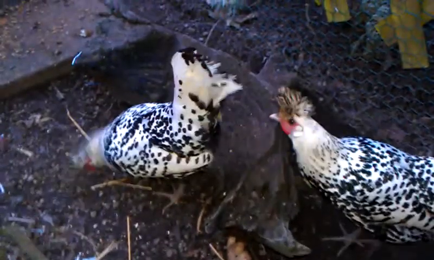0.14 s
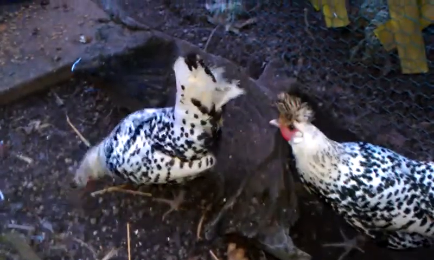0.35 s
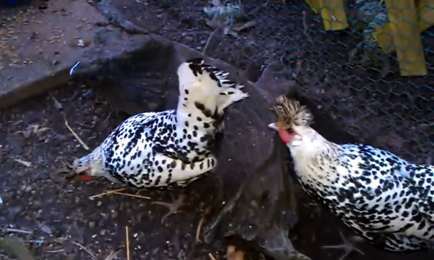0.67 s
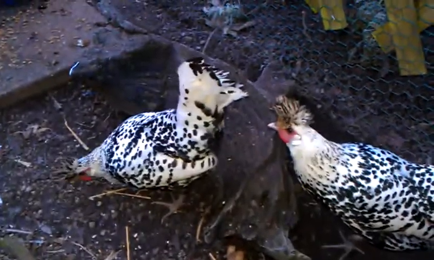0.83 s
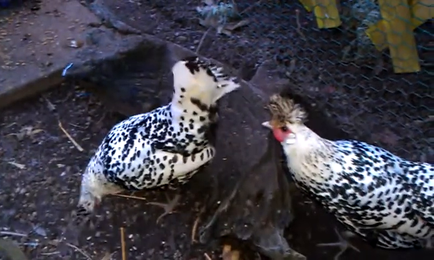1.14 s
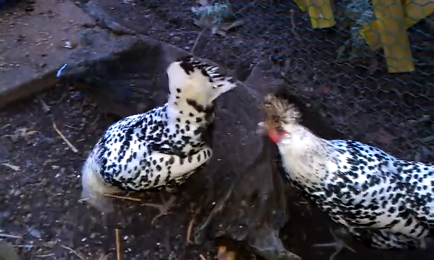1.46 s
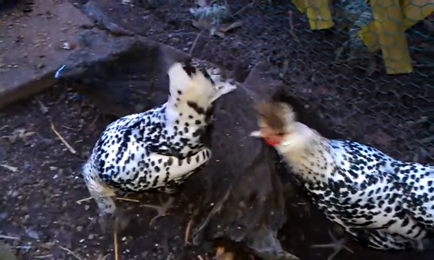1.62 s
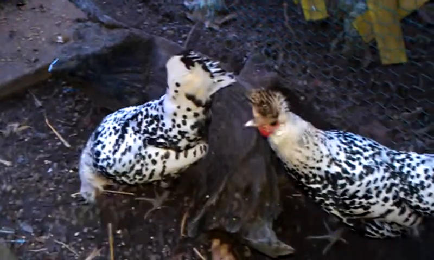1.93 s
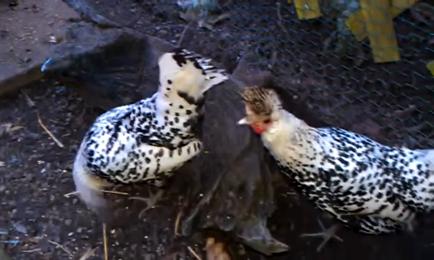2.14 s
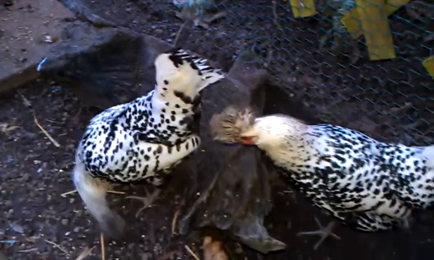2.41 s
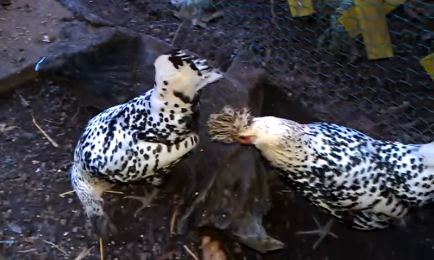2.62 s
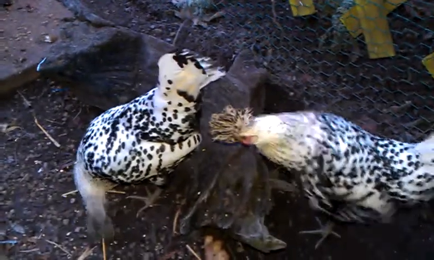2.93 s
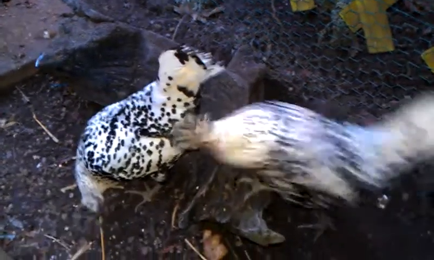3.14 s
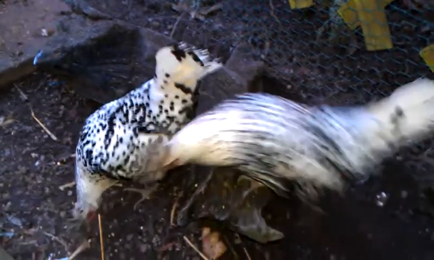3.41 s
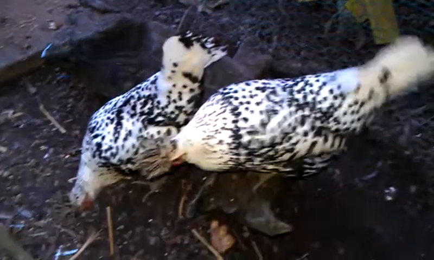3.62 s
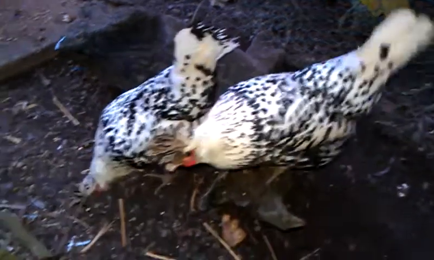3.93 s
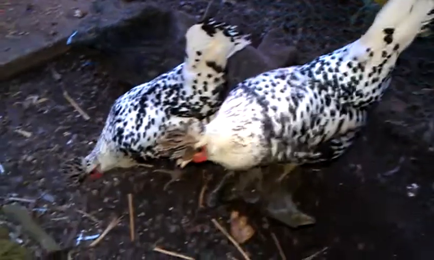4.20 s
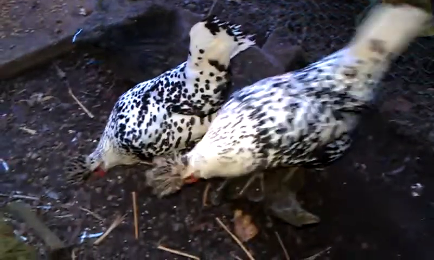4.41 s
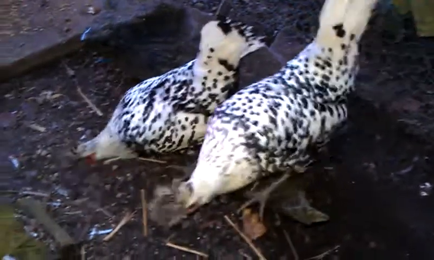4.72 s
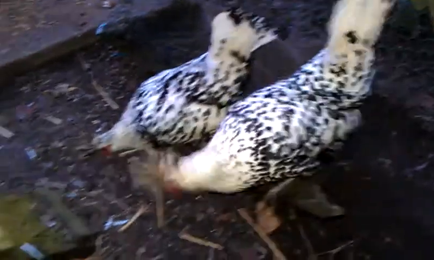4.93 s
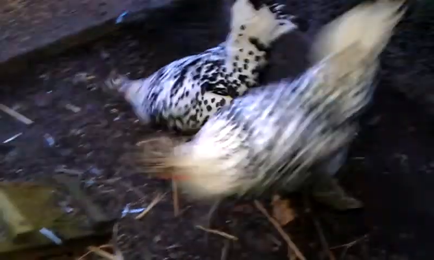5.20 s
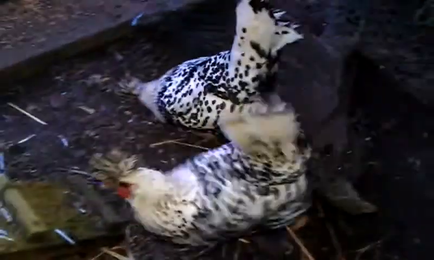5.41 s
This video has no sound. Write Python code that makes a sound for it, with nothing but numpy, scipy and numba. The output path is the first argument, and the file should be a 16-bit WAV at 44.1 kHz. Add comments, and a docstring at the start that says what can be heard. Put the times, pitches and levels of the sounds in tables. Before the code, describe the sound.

A close hen builds from a thin, climbing whine through a rough growl to about seven quick, raspy cackles, the loudest sound here. Before and just after her outburst, a small bird further off gives short, high, mostly falling chirps with some coop echo. Dry litter rustles and clicks under foot, feathers brush by near the end, and other birds murmur faintly in the quiet outdoor air of the run.

```python
"""Coop run, close to a hen. Her thin rising whine turns husky, breaks into a growl, then into a fast run
of harsh cackles: uneven syrinx pulses ring her mouth and open beak, coloured by fixed narrow resonances.
Further off, a small bird whistles sliding chirps in the echoing coop and other birds murmur.
Litter ticks and rustles under foot and feathers brush past, over quiet outdoor air."""
import sys
import numpy as np
from scipy import signal
from scipy.fft import rfft, irfft, next_fast_len
from scipy.io import wavfile
from scipy.ndimage import uniform_filter1d
from numba import njit

SR = 44100
rng = np.random.default_rng(int(sys.argv[2]) if len(sys.argv) > 2 else 0)


def master_out(mix):
    """Clip the mix to full scale and print it as 16-bit PCM to the path in sys.argv[1]."""
    frames = np.transpose(np.atleast_2d(mix))
    ceiling = np.clip(frames, -1, 1)
    pcm = np.round(ceiling * 32767).astype(np.int16)
    wavfile.write(sys.argv[1], SR, pcm)


N = 245195
T = np.arange(N) / SR

# outdoor air spectrum: (frequency [Hz], gain [dB])
AIR_SPECTRUM = [(15, -24), (25, -0.5), (144, -1), (221, -1.5), (322, -3), (552, -3.5), (648, -2),
                (945, -3.5), (2420, -11.5), (4040, -11), (6380, -10.5), (7910, -5), (9300, -13),
                (10400, -9), (15500, -18.5)]
# distant hens and one thin high note:
# (start [s], length [s], start pitch [Hz], end pitch [Hz], level [dB])
MURMUR_NOTES = [(0.937, 0.051, 649, 643, -65), (1.212, 0.13, 990, 1068, -60.5),
                (2.619, 0.365, 7800, 7980, -63), (2.703, 0.16, 930, 910, -61.5),
                (2.847, 0.093, 597, 625, -64.5), (5.382, 0.08, 1050, 1006, -58.5)]
# falling whistles: (time of top [s], lead-in [s], length after top [s], top pitch [Hz],
# bottom pitch [Hz], glide time [s], relative level [dB])
FALLING_NOTES = [(1.358, 0.035, 0.083, 6850, 4547, 0.022, -38.5),
                 (1.557, .014, 0.113, 4984, 2900, 0.033, -42), (1.883, 0.052, 0.21, 6736, 4600, 0.021, -35),
                 (2.085, 0.0082, .14, 4890, 3180, 0.042, -38.5),
                 (2.427, 0.04, 0.079, 6785, 4480, 0.032, -34), (2.651, .012, 0.11, 4770, 2790, .04, -42),
                 (5.335, 0.037, 0.094, 6775, 4480, 0.023, -35), (5.536, 0.0069, .1, 4960, 3190, .037, -33)]
# rising whistles: (start [s], length [s], held pitch [Hz], relative level [dB])
RISING_NOTES = [(1.673, 0.099, 4520, -44), (2.227, 0.092, 4415, -42.5), (2.77, 0.078, 4414, -43.5)]
# claws and grit: (time [s], level [dB])
CLAW_TICKS = [(.072, -49), (3.01, -51), (3.452, -46), (3.757, -47.5), (4.083, -33), (4.151, -41),
              (4.179, -44), (4.2745, -32.5), (5.3245, -27)]
# litter and feathers: (start [s], length [s], level [dB])
LITTER_RUSTLES = [(0.13, 0.53, -64), (0.514, 0.033, -61), (1.492, 0.11, -56), (2.019, 0.12, -55),
                  (2.598, 0.06, -54.5), (2.792, 0.03, -56), (3.006, 0.023, -53.5), (4.175, 0.043, -46.5),
                  (4.604, 0.098, -49.5), (5.167, 0.17, -46.5), (5.332, 0.065, -40.5), (5.413, 0.046, -44),
                  (5.485, 0.059, -52.5)]
# tick and rustle spectrum: (frequency [Hz], gain [dB])
LITTER_SPECTRUM = [(1500, -34.5), (3500, -10), (5500, -7.5), (7600, 2.5), (9000, -7.5), (11000, -17.5),
                   (15500, -24)]
# reflections off ground and boards: (delay [s], gain [dB])
NEAR_REFLECTIONS = [(.00235, -13.5), (.0035, -12), (.0071, -10.5)]
# fixed narrow resonances that colour the hen's calls in the coop: (frequency [Hz], width [Hz], gain [dB])
COOP_RESONANCES = [(381.7, 14.3, -10.5), (650, 26, -11.5), (856, 116, -2.5), (1057, 128, 4.5),
                   (1326, 46, 8.5), (1440, 68, 6.5), (1560, 27, 4.5), (1738, 16, 2), (1908, 70, 0),
                   (2130, 230, -7.5)]
# what the mouth lets out: (frequency [Hz], gain [dB])
MOUTH_RESPONSE = [(260, -74), (355, 0), (460, -4.5), (620, 2.5), (1750, 1), (2130, -8), (2500, -2),
                  (3300, -24), (6000, -46)]
# short clucks ahead of calls: (time [s], level [dB])
SYRINX_CATCHES = [(3.139, -47.5), (4.268, -39.5), (4.393, -41.5), (4.643, -44), (4.803, -42.5),
                  (4.953, -48), (5.102, -44.5)]
# whine pitch, a dip then a climb with pressure: (time [s], pitch [Hz])
WHINE_CONTOUR = [(3.17, 762), (3.2, 636), (3.282, 641), (3.324, 707), (3.342, 694), (3.79, 820.5)]
# whine, stuttering then held with two breaks: (start [s], end [s], level [dB])
WHINE_SPANS = [(3.177, 3.183, -47.5), (3.196, 3.221, -51), (3.231, 3.269, -48), (3.28, 3.294, -48.5),
               (3.305, 3.653, -49), (3.66, 3.743, -47.5), (3.753, 3.875, -46.5)]
# syrinx pulses, quickening with excitement: (time [s], nominal rate [Hz])
SYRINX_RATE = [(4.05, 174.9), (4.7, 249.8), (5.0, 262.8)]
# rasp spectrum ahead of the beak modes: (frequency [Hz], gain [dB])
RASP_SPECTRUM = [(1900, -44), (2750, 5.5), (3500, 0), (3850, 6), (5450, 1), (6500, 1), (8000, 4),
                 (9300, -7), (10200, -55), (15500, -56)]
# open beak: (multiple of lower beak resonance [ratio], width [Hz], relative gain [dB])
LOWER_BEAK_MODES = [(.87, 150, -17), (1., 287, 1.5), (1.225, 200, -5), (2.06, 260, -8)]
# high sizzle on the rasp: (frequency [Hz], gain [dB])
SIZZLE_SPECTRUM = [(7000, -12), (9200, 2), (10400, 2), (11300, 0), (15500, -19)]
# calls, a long growl first: (start [s], end [s], start level [dB], swell over call [dB],
# start rasp re level [dB], start syrinx ring [Hz], mouth resonance [Hz], lower beak resonance [Hz],
# upper beak resonance [Hz], upper resonance gain [dB])
CACKLE_CALLS = [(3.786, 4.175, -43.5, 9.5, -11.5, 798.4, 1410, 4980, 7770, 6.5),
                (4.279, 4.324, -32.5, -2.5, -13.5, 800, 1390, 4700, 7650, -15),
                (4.398, 4.423, -36, 10, -16, 990, 1540, 4660, 7350, 3),
                (4.419, 4.568, -33.5, -1.5, -10, 864, 1630, 4500, 7760, 9.5),
                (4.653, 4.73, -27.5, -2, -4.5, 845, 1560, 4460, 7270, 16.5),
                (4.812, 4.867, -29, -3, -2.5, 895, 1590, 4620, 7570, 20),
                (4.963, 5.028, -27, -3, -2.5, 810, 1620, 4250, 7120, 13),
                (5.11, 5.188, -25.5, -8.5, -1, 850, 1640, 4540, 7760, 18),
                (5.274, 5.31, -37.5, 9, -15, 890, 1670, 5028, 8230, 14)]


def undb(db):
    """Decibels to gain."""
    return 10 ** (np.asarray(db) / 20)


def unit(x):
    """Scale to rms 1."""
    return x / np.sqrt(np.mean(x ** 2))


def even(x, span_s):
    """Hold rms near 1 over span_s; keep the faster grain."""
    return x / np.sqrt(uniform_filter1d(x ** 2, int(span_s * SR)) + 1e-9 * np.mean(x ** 2))


def noise():
    """White noise."""
    return rng.standard_normal(N)


def walk(rate_hz):
    """Smooth random wander, rms 1."""
    size = int(SR / rate_hz)
    return unit(uniform_filter1d(uniform_filter1d(noise(), size), size))


def curve(points):
    """Straight lines through (time [s], value) points."""
    return np.interp(T, *np.transpose(points))


def swell(start_s, length_s):
    """Half-sine envelope."""
    return np.sin(np.pi * np.clip((T - start_s) / length_s, 0, 1))


def held(start_s, end_s, attack_s, release_s):
    """Flat envelope, ramps centred on start and end."""
    return np.clip(.5 + (T - start_s) / attack_s, 0, 1) * np.clip(.5 + (end_s - T) / release_s, 0, 1)


def bursts(rows, decay_s):
    """Envelope of sudden onsets with exponential decay."""
    return sum(undb(db) * (T >= at_s) * np.exp(-np.abs(T - at_s) / decay_s) for at_s, db in rows)


def colour(x, spectrum):
    """Filter by (frequency [Hz], gain [dB]) points."""
    hz, db = np.transpose(spectrum)
    size = next_fast_len(N)
    bins_hz = np.maximum(np.fft.rfftfreq(size, 1 / SR), 1)
    gain = undb(np.interp(np.log(bins_hz), np.log(hz), db))
    return irfft(rfft(x, size) * gain, size)[:N]


@njit
def svf(x, hz, width_hz):
    """State-variable band-pass, moving centre."""
    y, band, low = np.empty(len(x)), 0., 0.
    for i in range(len(x)):
        g, damping = np.tan(np.pi * hz[i] / SR), width_hz / hz[i]
        v = (band + g * (x[i] - low)) / (1 + g * (g + damping))
        band, low = 2 * v - band, low + 2 * g * v
        y[i] = damping * v
    return y


def ring(x, hz, width_hz):
    """One resonance, gain 1 at centre."""
    return svf(x, hz * np.ones(N), float(width_hz))


def echo(x, t60_s, delay_s):
    """Dense decaying reflections, unit energy gain."""
    t = T[:SR]
    tail = noise()[:SR] * undb(-60 * t / t60_s) * (t > delay_s)
    return signal.fftconvolve(x, tail / np.linalg.norm(tail))[:N]


def bounce(x):
    """Add first reflections, which comb the spectrum."""
    return x + sum(undb(db) * np.interp(T - delay_s, T, x, left=0) for delay_s, db in NEAR_REFLECTIONS)


def air(level_db=-60.5):
    """Steady outdoor air with a high hiss."""
    return undb(level_db) * unit(colour(noise(), AIR_SPECTRUM))


def murmurs(waver=.028):
    """Faint gliding notes of distant birds."""
    wobble = 1 + waver * walk(115)
    notes = np.zeros(N)
    for start_s, length_s, from_hz, to_hz, db in MURMUR_NOTES:
        hz = np.interp(T, [start_s, start_s + length_s], [from_hz, to_hz]) * wobble
        notes += undb(db) * swell(start_s, length_s) * np.sin(2 * np.pi * np.cumsum(hz) / SR)
    return notes


def slur(top_s, lead_s, length_s, top_hz, bottom_hz, glide_s, db, grow_db_per_s=216, fade_db_per_s=123):
    """Pitch and gain of a whistle that arches up, falls and levels out as it fades."""
    before_s, after_s = np.clip(top_s - T, 0, lead_s), np.maximum(T - top_s, 0)
    fall = np.exp(-(after_s / glide_s) ** 1.25)
    sag_hz = .16 * top_hz * (before_s / .045) ** 2  # leads in flat
    hz = bottom_hz + (top_hz - bottom_hz) * fall - sag_hz
    since_peak_s = T - top_s - .0061  # strongest just after the top
    gain = undb(db + np.minimum(grow_db_per_s * since_peak_s, -fade_db_per_s * since_peak_s))
    return hz, gain * held(top_s - lead_s, top_s + length_s, attack_s=.003, release_s=.02)


def scoop(start_s, length_s, top_hz, db, from_hz=3200, glide_s=.028):
    """Pitch and gain of a whistle that scoops up and holds."""
    low = np.exp(-(np.maximum(T - start_s, 0) / glide_s) ** 2)
    hz = top_hz + (from_hz - top_hz) * low
    return hz, undb(db) * held(start_s, start_s + length_s, attack_s=.011, release_s=.036)


def whistle(hz, gain, knee_hz=4430, db_per_octave=29):
    """Pure tone; the voice thins out below the knee."""
    weak_db = db_per_octave * np.minimum(np.log2(hz / knee_hz), 0)
    return np.sqrt(2) * gain * undb(weak_db) * np.sin(2 * np.pi * np.cumsum(hz) / SR)


def small_bird(waver=.008, flicker_db=2, direct_db=-8, echo_db=-3):
    """Sliding whistles across the coop, more echo than direct sound."""
    wobble = 1 + waver * walk(364)
    notes = [slur(*row) for row in FALLING_NOTES] + [scoop(*row) for row in RISING_NOTES]
    song = sum(whistle(hz * wobble, gain) for hz, gain in notes) * undb(flicker_db * walk(42))
    return undb(direct_db) * song + undb(echo_db) * echo(song, t60_s=.44, delay_s=.00093)


def litter(grain_db=3):
    """Dry straw and grit: grainy rustles, single ticks."""
    rustle = unit(colour(noise() * undb(grain_db * walk(450)), LITTER_SPECTRUM))
    stir = sum(undb(db) * swell(start_s, length_s) for start_s, length_s, db in LITTER_RUSTLES)
    ticks = unit(colour(noise(), LITTER_SPECTRUM)) * bursts(CLAW_TICKS, decay_s=.0035)
    return rustle * stir + ticks


def feathers(start_s=5.19, length_s=.24, level_db=-53, centre_hz=2750, width_hz=400):
    """Feathers brush past as the hen turns."""
    band = ring(ring(noise(), centre_hz, width_hz), centre_hz, width_hz)
    return unit(band) * undb(level_db) * swell(start_s, length_s)


def coop_colour(x):
    """Fixed narrow resonances that colour the hen's calls in the coop, band-limited."""
    peaks = sum(undb(db) * ring(x, hz, width_hz) for hz, width_hz, db in COOP_RESONANCES)
    return colour(peaks, MOUTH_RESPONSE)


def catches(hollow_hz=700, hollow_db=8):
    """The syrinx snaps open before sounding: a short hollow cluck."""
    puff = coop_colour(noise())
    cluck = puff + undb(hollow_db) * ring(puff, hollow_hz, width_hz=160)
    envelope = uniform_filter1d(bursts(SYRINX_CATCHES, decay_s=.012), size=150)
    return even(cluck, span_s=.0087) * envelope


def whine(drift=.01225, waver=.01395, flutter=1.1, husk_db=-3, rattle_db=3, rough_from_s=3.21):
    """Note plus octave; with rising pressure it flutters, loses the octave and turns husky."""
    rough = np.clip(.16 + 1.16 * np.maximum(T - rough_from_s, 0), 0, 1)
    wobble = 1 + drift * walk(25.3) + waver * walk(134) + 2 * waver * rough * walk(330)
    phase = 2 * np.pi * np.cumsum(curve(WHINE_CONTOUR) * wobble) / SR
    octave_db = 2 - 22 * rough
    tone = np.sin(phase) + undb(octave_db) * np.sin(2 * phase)
    tone *= np.exp(flutter * rough * walk(530))
    breath = noise() * undb(rattle_db * walk(420))
    husk = undb(husk_db) * rough * unit(coop_colour(breath))
    push = sum(undb(db) * held(start_s, end_s, attack_s=.012, release_s=.012)
               for start_s, end_s, db in WHINE_SPANS)
    return (even(tone, span_s=.022) + husk) * push


def syrinx(rate_hz, jitter=.35, scatter_db=1.8, puff_s=.005):
    """Membranes slap at uneven intervals; each slap releases a puff of air."""
    gap, strength = rng.standard_normal((4000, 2)).T
    at = np.searchsorted(np.cumsum(rate_hz) / SR, np.cumsum(np.exp(jitter * gap)))
    slaps = np.bincount(at[at < N], undb(scatter_db * strength[at < N]), N)
    puffs = signal.lfilter([1], [1, -np.exp(-1 / (puff_s * SR))], slaps) * noise()
    return unit(slaps), unit(puffs)


def beak(hiss, lower_hz, upper_hz, upper_db, lower_db=12):
    """Hiss plus the sharp modes it rings in the open beak."""
    lower = sum(undb(lower_db + db) * ring(hiss, ratio * lower_hz, width_hz)
                for ratio, width_hz, db in LOWER_BEAK_MODES)
    upper = undb(upper_db) * ring(hiss, upper_hz, width_hz=160)
    return hiss + lower + upper


def cackle(attack_s=.0072, rasp_attack_s=.0097, release_s=.013, tighten_hz_per_s=530,
           mouth_db=-3, sizzle_db=-20):
    """Abrupt pushes of air; their rough pulses ring syrinx, mouth, beak and the coop resonances."""
    calls = np.array(CACKLE_CALLS)
    now = np.maximum(np.searchsorted(calls[:, 0], T) - 1, 0)
    start_s, end_s, db, swell_db, rasp_db, ring_hz, mouth_hz, lower_hz, upper_hz, upper_db = calls[now].T
    along = np.clip((T - start_s) / (end_s - start_s), 0, 1)
    attack = np.clip((T - start_s) / attack_s, 0, 1)
    release = np.exp(-np.maximum(T - end_s, 0) / release_s)
    push = undb(db + swell_db * along) * attack * release
    push = uniform_filter1d(push, size=100)  # pressure cannot jump

    slaps, puffs = syrinx(curve(SYRINX_RATE))
    drive = slaps + .5 * puffs
    note_hz = ring_hz + tighten_hz_per_s * (end_s - start_s) * along  # syrinx tightens in each call
    note = colour(ring(drive, note_hz, width_hz=55), MOUTH_RESPONSE)
    voice = coop_colour(drive)
    body = bounce(voice + note + undb(mouth_db) * ring(voice, mouth_hz, width_hz=200))

    hiss = colour(puffs + .25 * slaps, RASP_SPECTRUM)
    droop = 1 + .039 * (.5 - along)  # modes sink as the beak closes
    rasp = bounce(beak(hiss, lower_hz * droop, upper_hz * droop, upper_db))
    rasp_attack = np.clip((T - start_s) / rasp_attack_s, 0, 1)  # needs full pressure, so lags the body
    force = push * undb(rasp_db + .62 * swell_db * along) * rasp_attack
    sizzle = unit(bounce(colour(puffs, SIZZLE_SPECTRUM)))
    sizzle *= undb(sizzle_db) * np.sqrt(force / force.max())  # favours the hardest pushes
    return push * even(body, span_s=.02) + force * (even(rasp, span_s=.024) + sizzle)


def scene(echo_db=-26):
    """Near hen, almost dry, over distant birds and air; both channels alike."""
    near = whine() + cackle() + catches() + litter() + feathers()
    coop = undb(echo_db) * echo(near, t60_s=1.0, delay_s=.024)
    mono = near + coop + small_bird() + murmurs() + air()
    return np.array([mono, mono])


def record(dry, top_hz=15900):
    """Steep low-pass."""
    return signal.sosfilt(signal.ellip(10, .2, 70, top_hz, fs=SR, output="sos"), dry)


dry = scene()
out = record(dry)
master_out(out)
```